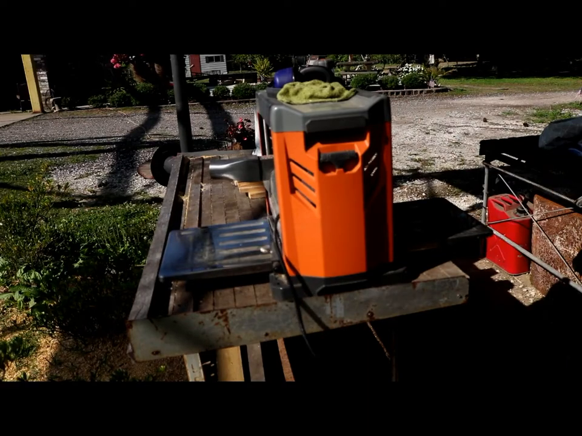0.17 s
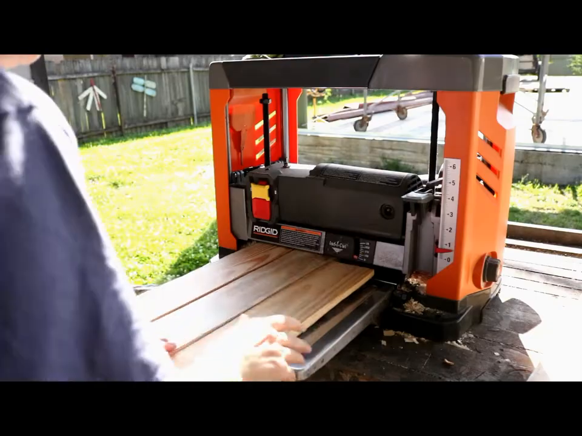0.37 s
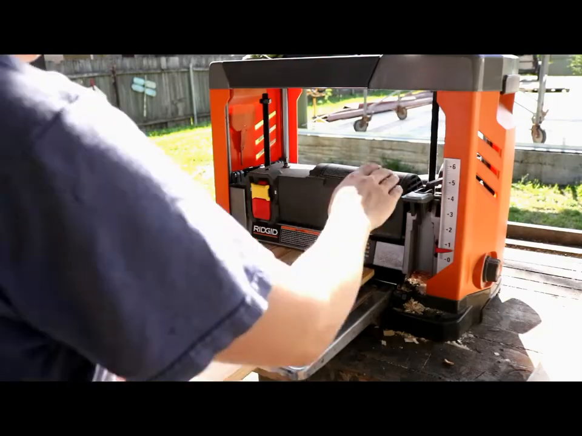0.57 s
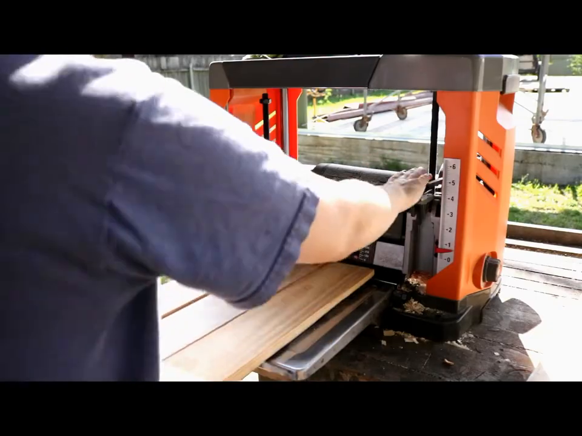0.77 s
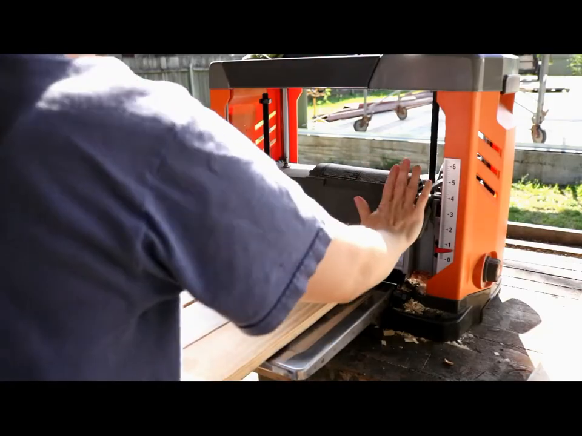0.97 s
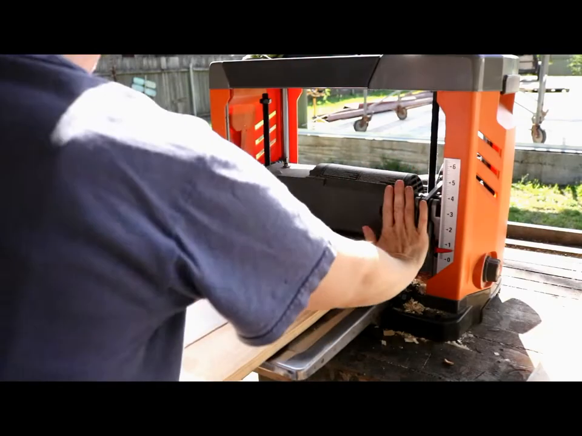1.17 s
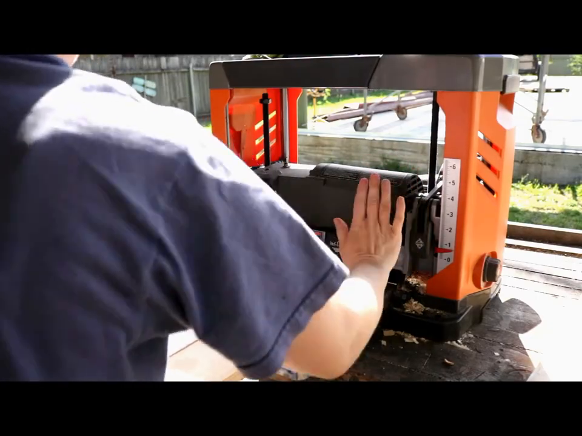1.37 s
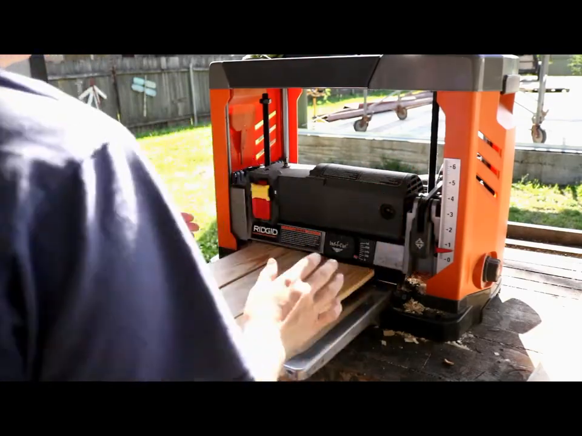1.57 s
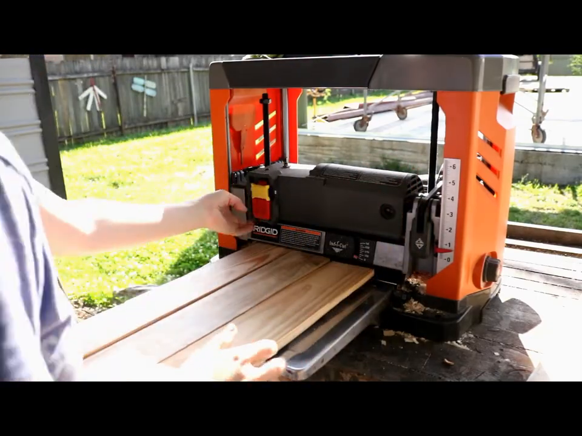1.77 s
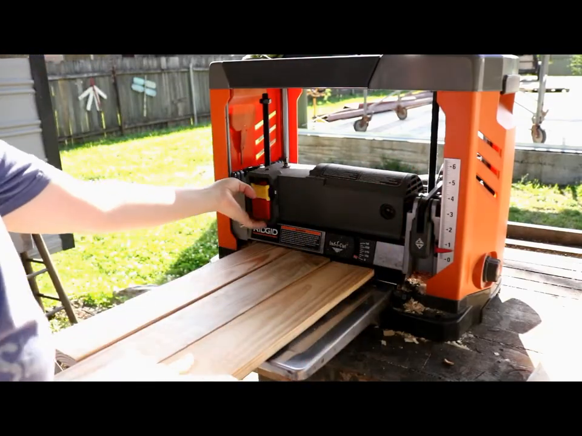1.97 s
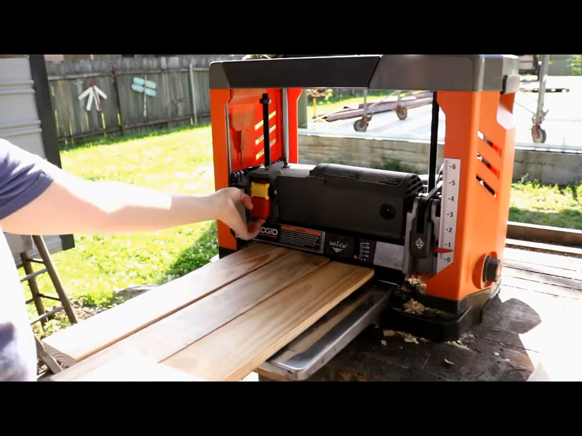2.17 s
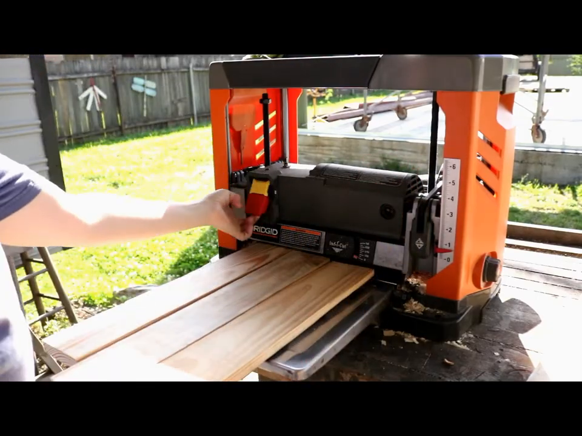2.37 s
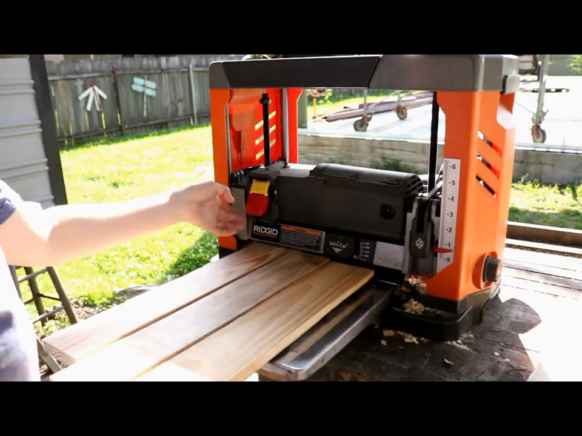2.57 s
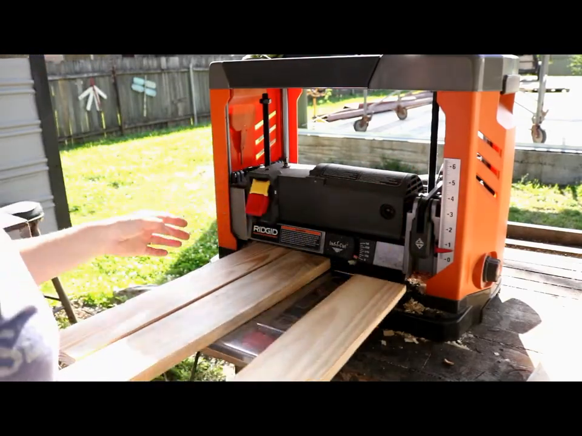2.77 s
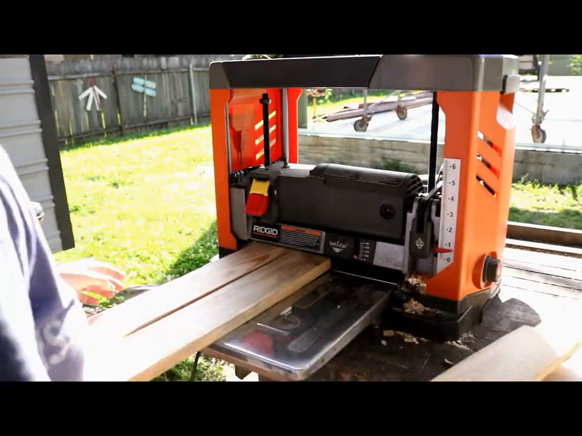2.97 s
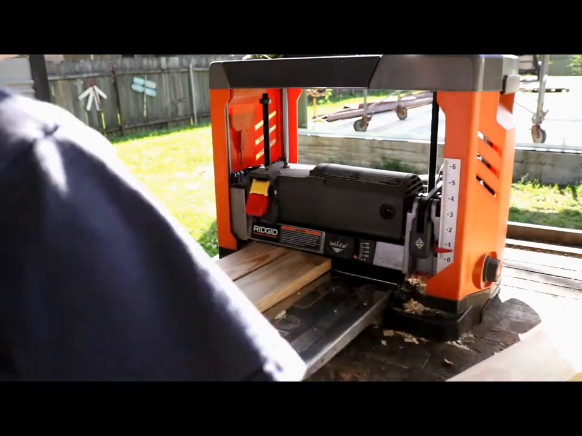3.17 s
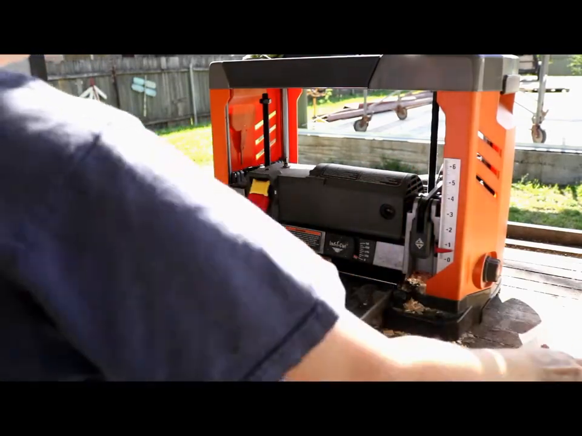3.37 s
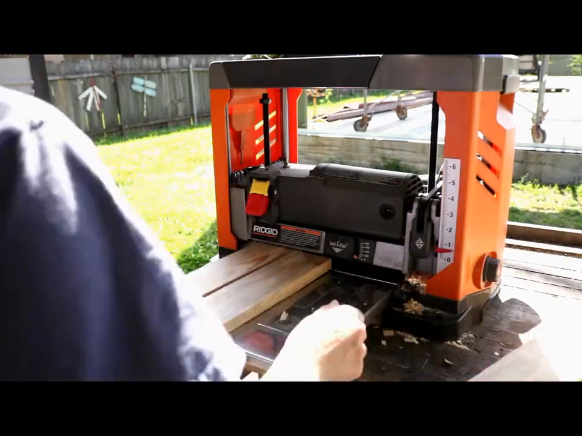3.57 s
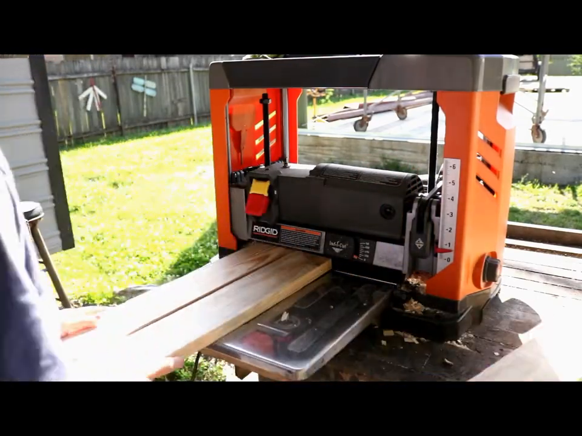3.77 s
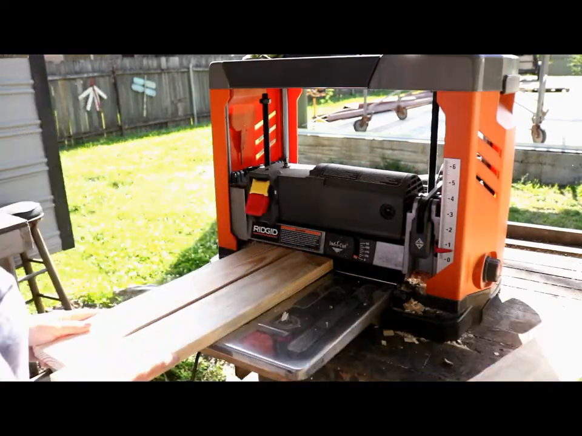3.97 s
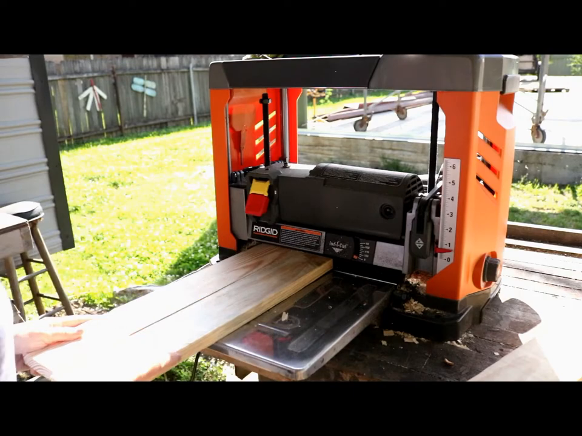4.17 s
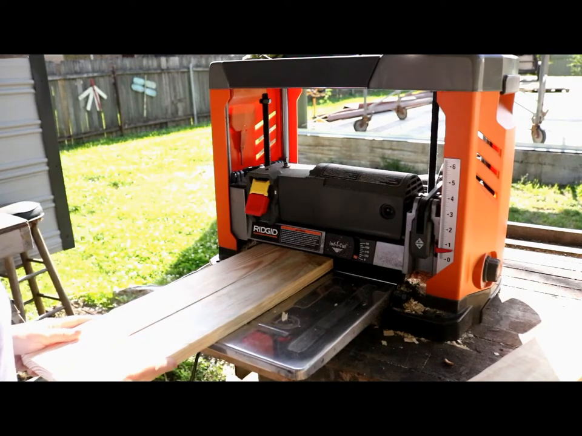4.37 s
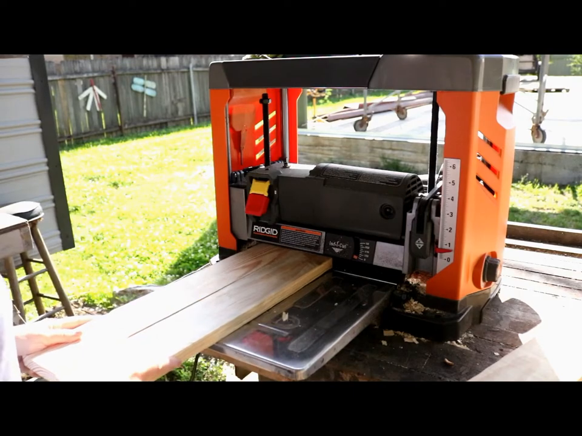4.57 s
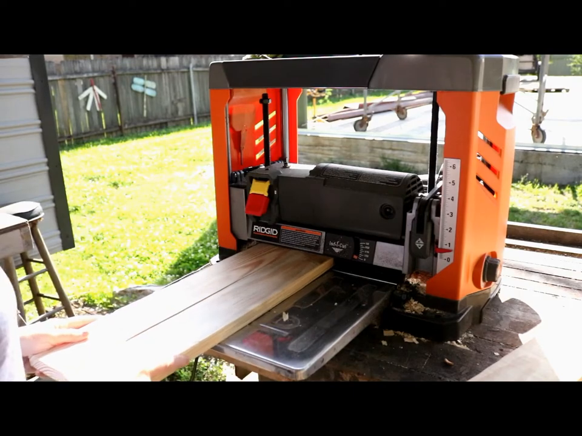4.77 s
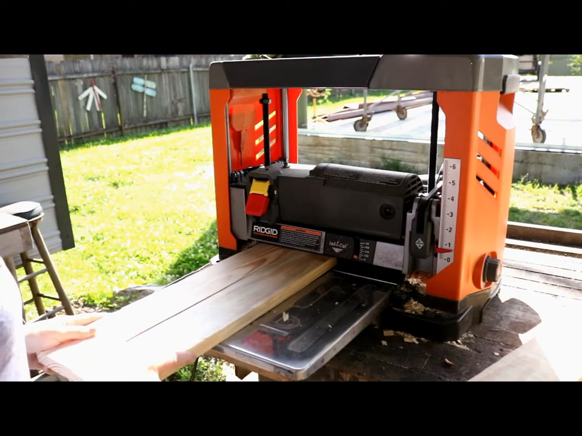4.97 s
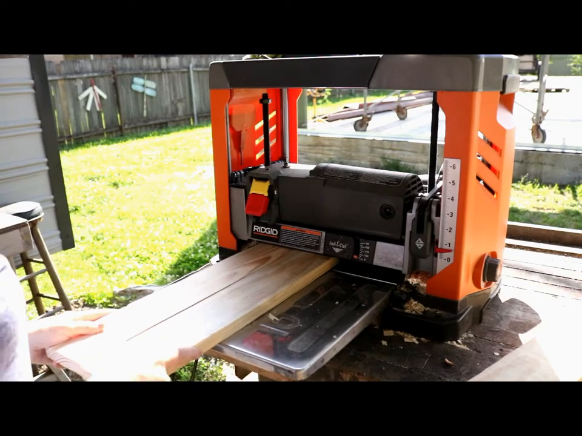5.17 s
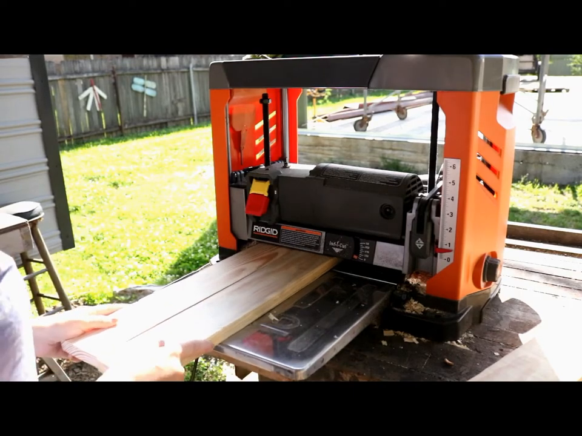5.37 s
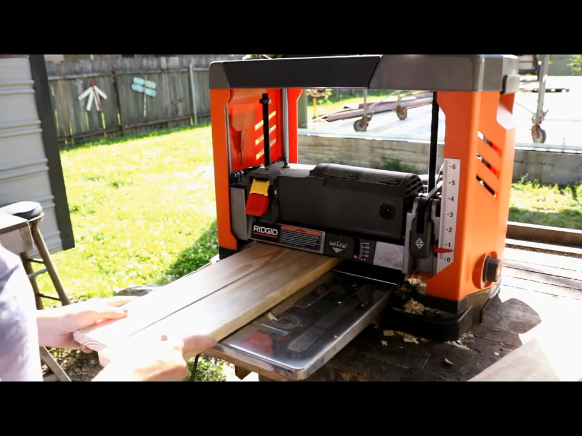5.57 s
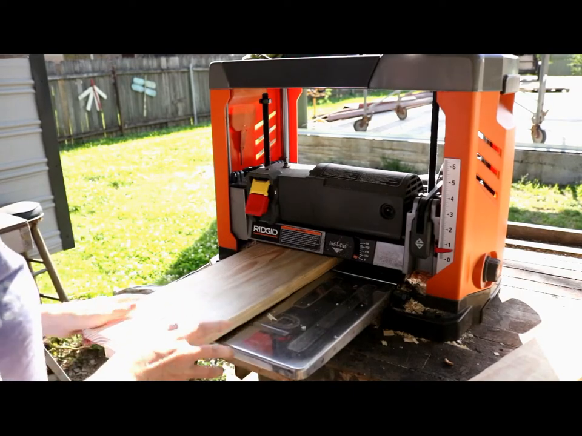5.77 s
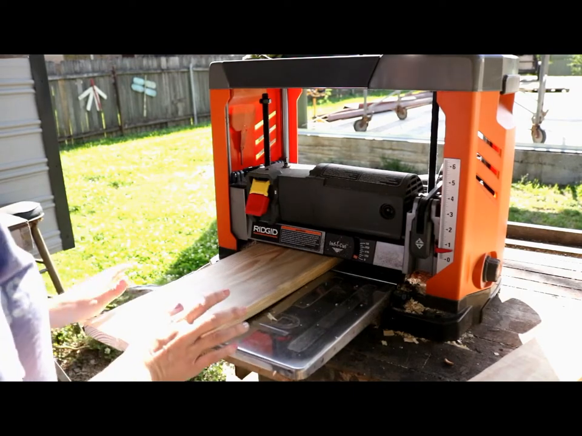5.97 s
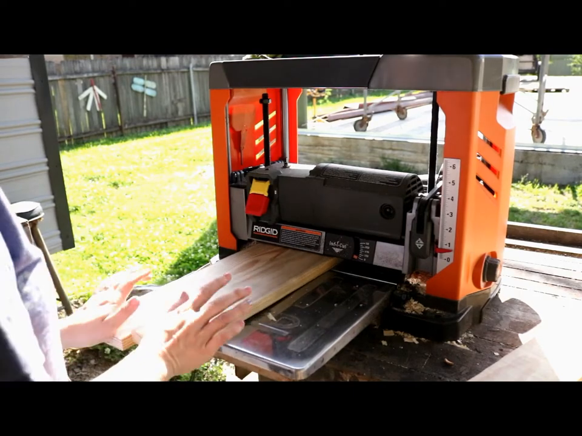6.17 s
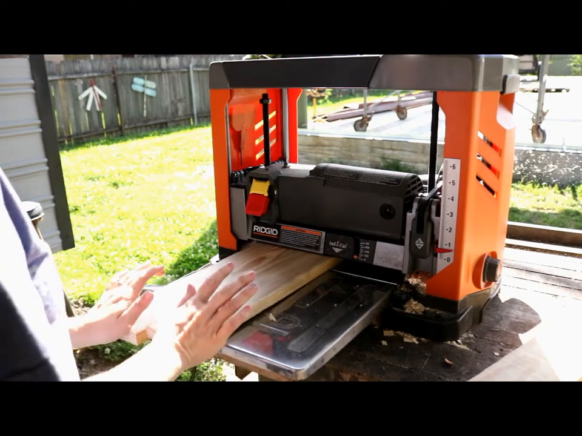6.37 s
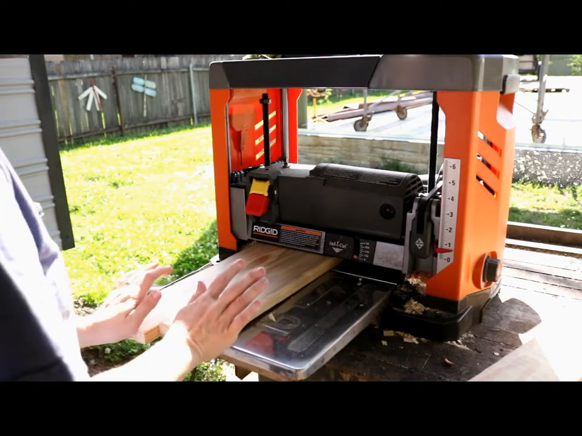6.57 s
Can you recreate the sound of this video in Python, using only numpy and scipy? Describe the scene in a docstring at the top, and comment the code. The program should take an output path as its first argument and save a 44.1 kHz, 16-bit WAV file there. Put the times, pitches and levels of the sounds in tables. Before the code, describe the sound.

A benchtop wood planer clicks on outdoors, winds up to a loud throbbing whine, then starts chopping into a board.

```python
"""First the hush of a yard: an engine hums far off, feet scuff and a bird whistles.
Close to the stereo microphone, the lever of a benchtop thickness planer snaps shut and its switch clicks.
The motor growls up to a siren whine that throbs against the cutterhead, over a rush of thrown air.
Near the end a board reaches the knives: they hammer chips off it and drag the motor down."""
import sys
import numpy as np
from scipy import signal
from scipy.fft import rfft, irfft, next_fast_len
from scipy.io import wavfile
from scipy.ndimage import map_coordinates

SR = 44100
rng = np.random.default_rng(int(sys.argv[2]) if len(sys.argv) > 2 else 0)


def materialize(psi):
    """Save the field psi as 16-bit PCM at rate SR to the path in sys.argv[1].

    A 1-D psi becomes a single channel; in a 2-D psi each row is a channel.
    """
    bounded = np.clip(np.atleast_2d(psi).T, -1, 1)
    quanta = np.round(bounded * 32767).astype(np.int16)
    wavfile.write(sys.argv[1], SR, quanta)


N = 291501
TIME = np.arange(N) / SR
ON_S, FEED_S, BITE_S = 2.32, 5.6, 6.224  # the motor starts, the rollers take the board, the knives bite
TONES_S, TONES_RISE_S = 2.374, 0.16  # the running tones fade in
FREE_HZ, BELT_RATIO = 438.1, .326875  # unloaded motor speed; cutterhead turns per motor turn


def motor_speed(surge_share=.4652, surge_s=.1579, creep_s=.5675, feed_drop_hz=2.2, sag_hz_per_s=100):
    """Turns per second: a quick surge and a slow creep toward free speed, then a sag under the cut."""
    t = np.maximum(TIME - ON_S, 0)
    shortfall = surge_share * np.exp(-t / surge_s) + (1 - surge_share) * np.exp(-t / creep_s)
    sag = sag_hz_per_s * np.cumsum(ramp(BITE_S, .07)) / SR
    return np.maximum(FREE_HZ * (1 - shortfall) - feed_drop_hz * ramp(FEED_S, .5) - sag, 0)


# The housing's response to the whine, its octave and further partials: (frequency [Hz], level [dB])
WHINE_RESPONSE = [(470, -60), (530, -30), (610, -20), (720, -20), (768, -16.5), (820, -15), (870, -16.7)]
OCTAVE_RESPONSE = [(500, -22), (900, -31), (1400, -37), (1650, -44.5), (1760, -34.5)]
PARTIAL_RESPONSE = [(1200, -46), (2050, -32.5), (2450, -39), (2620, -37.5), (3000, -49), (3500, -43.5),
                    (5500, -46), (7600, -52), (8500, -54.5), (9300, -59.5)]
# Resonances the octave sweeps through: (frequency [Hz], width [Hz], boost [dB])
OCTAVE_MODES = [(1107, 76, 12.5), (1424, 60, 7.5), (1566, 70, 13.5), (1716, 54.6, 11)]
# Further partials; the highest lies near twice the gears' whistle and lingers faintly: (order [cycles per motor
# turn])
PARTIAL_ORDERS = [6, 8, 21.2]
# The whine's place between the microphones: (frequency [Hz], left minus right [dB])
WHINE_BALANCE = [(530, -4), (700, -3.5), (795, 1), (830, -1), (872, -3)]
def motor_whine(speed, motor, lead_cycles=0.066, partial_lead_cycles=-0.089):
    """The motor's siren, close up: each tone swells and fades as it crosses the housing's response."""
    mics = np.array([[.5], [-.5]])  # a tone meets each microphone at its own level and phase
    motor = motor + 0.0055 * wobble(25)
    whine_db = along(WHINE_RESPONSE, 2 * speed) + 0.6 * wobble(30)
    whine_db = whine_db + mics * along(WHINE_BALANCE, 2 * speed)
    whine = amp(whine_db) * tone(2 * motor + mics * lead_cycles)
    octave_db = spectrum(OCTAVE_RESPONSE, OCTAVE_MODES)(4 * speed) + 1.2 * wobble(25)
    partials = amp(octave_db) * tone(4 * motor + mics * partial_lead_cycles)
    for order in PARTIAL_ORDERS:
        partial_db = along(PARTIAL_RESPONSE, order * speed) + 2.36 * wobble(20)
        partials += amp(partial_db) * tone(order * motor + mics * partial_lead_cycles)
    return ramp(TONES_S, TONES_RISE_S) * board_muffle() * (whine + partials * amp(mics * 0.79))


# The housing's response to the passing knives: (frequency [Hz], level [dB])
KNIFE_RESPONSE = [(160, -36), (255, -34), (310, -29.5), (364, -22), (400, -30.5), (419, -38), (428, -27.5)]
# Shaking, with half orders from the belt: (order [cycles per cutterhead turn], level before strain [dB])
SHAKE_ORDERS = [(2, -50), (2.5, -53.5), (3.5, -62), (4, -42.5), (4.5, -50), (9, -44)]
def cutterhead(speed, cutter):
    """Three spinning knives hum; their second harmonic lies just below the whine and beats with it."""
    cutter = cutter + 0.0029 * wobble(20)
    knives = amp(along(KNIFE_RESPONSE, 3 * BELT_RATIO * speed)) * tone(3 * cutter)
    throb = amp(-31 + wobble(6)) * tone(6 * cutter)
    shaking = sum(amp(db + 2.5 * wobble(8)) * tone(order * cutter) for order, db in SHAKE_ORDERS)
    strain = amp(np.interp(speed, [205, 365, 418], [-3, 7.5, 0]))  # the belt pulls hardest in the run-up
    unbalance = amp(-51) * (speed / FREE_HZ) ** 25 * tone(cutter)
    muffle = board_muffle()
    hum = muffle * strain * (throb + shaking) + np.sqrt(muffle) * knives + unbalance
    return ramp(TONES_S, TONES_RISE_S) * hum


def board_muffle(depth_db=-8.5, close_s=0.17):
    """Gain on the running tones: the board blocks the opening and damps them."""
    return amp(depth_db * ramp(BITE_S, close_s))


# Level of the hiss as heard, ducking while the whistle and whine are loudest: (time [s], level [dB])
HEARD_HISS_LEVELS = [(2.45, -33), (2.6, -40), (2.63, -32), (2.64, -29.5), (2.71, -32), (3.1, -33.5),
                     (3.15, -37), (4.09, -32.5), (4.22, -35), (5.43, -35), (5.49, -36), (6.2, -36.5)]
# Colour of the rush: (frequency [Hz], relative level [dB])
RUSH_SPECTRUM = [(20, -17.5), (60, -23.5), (150, -9.5), (300, -6), (600, 0.5), (1000, 1.5), (1900, 1),
                 (2700, -0.5), (3600, -5.5), (6200, -10), (9000, -16.5), (11000, -25.5), (15500, -38.5)]
# Resonances of the housing: (frequency [Hz], width [Hz], boost [dB])
HOUSING_MODES = [(384, 74, 8), (826, 276, 7), (2250, 340, 3), (3033, 340, 9), (4223, 320, 8.5)]
# The rush's place between the microphones: (frequency [Hz], left minus right [dB])
RUSH_BALANCE = [(60, 7.5), (110, 0.5), (200, 4), (380, 0.0), (700, -3), (1290, -1.5), (2380, 4), (4400, 0),
                (8120, -1), (15000, 0.5)]
def air_rush(cutter, pulse_depth=0.097, body_over_hiss_db=9.5):
    """Fan and cutterhead throw air through the housing, pulsing with each turn of the cutterhead."""
    flow = noise(side_db=0) * (1 + pulse_depth * np.sin(2 * np.pi * cutter))
    left, right = shaped(flow, RUSH_SPECTRUM, HOUSING_MODES)
    left = coloured(left, lambda hz: along(RUSH_BALANCE, hz) / 2)
    right = coloured(right, lambda hz: -along(RUSH_BALANCE, hz) / 2)
    level_db = np.interp(TIME, *np.transpose(HEARD_HISS_LEVELS)) + body_over_hiss_db + .5 * wobble(12)
    return np.array([left, right]) * amp(level_db) * ramp(ON_S, 0.011)


# Colours of the dull blows and the bright snap: (frequency [Hz], relative level [dB])
BLOW_SPECTRUM = [(60, -32), (300, -28), (600, -12), (850, 4.5), (1250, 8.5), (1700, 6.5), (2200, 1),
                 (3600, 1), (6000, -32), (15500, -44)]
SNAP_SPECTRUM = [(100, -52), (1000, -13), (1800, -4), (2900, 0.5), (3600, 1), (4400, -4.5), (5500, -7.5),
                 (9000, -14.5), (12000, -23.5), (15500, -31)]
# Resonances of board and bed: (frequency [Hz], width [Hz], boost [dB])
BOARD_MODES = [(550, 110, 7), (1240, 200, 4.5), (1597, 250, 8.5), (1920, 330, 8), (2900, 580, 3.5),
               (4240, 310, 8.5)]
# Harder grain tears brightly: (time [s], level [dB], half length [s])
GRAIN_TEARS = [(6.245, -22.5, 0.026), (6.33, -33.5, 0.028), (6.405, -25.5, 0.031), (6.54, -33, 0.011)]
def cutting(cutter, knives=3, low_knife_gain=.2, scatter_db=1.2, tear_s=0.004, hood_t60=0.018):
    """Each knife strikes the board and tears off a chip; one stands proud and hits hardest."""
    passes = np.floor(cutter * knives).astype(int)
    hits = np.flatnonzero(np.diff(passes)) + 1
    scatter = amp(scatter_db * rng.standard_normal(N)[passes[hits]])
    blows = np.zeros(N)
    blows[hits] = np.where(passes[hits] % knives, low_knife_gain, 1) * scatter
    tear_envelope = signal.lfilter([1], [1, -np.exp(-1 / (tear_s * SR))], blows)
    fibres = amp(-9) * unit(tear_envelope * noise(side_db=-1))
    t = np.arange(SR // 40) / SR
    hood = rng.standard_normal((2, len(t))) * amp(-60 * t / hood_t60)  # dense reflections under the hood
    smeared = unit(signal.fftconvolve(blows[None], hood, axes=1)[:, :N])
    dull = shaped(amp(-4) * unit(blows) + smeared + fibres, BLOW_SPECTRUM, BOARD_MODES)
    snap = shaped(smeared + 2 * fibres, SNAP_SPECTRUM, BOARD_MODES)
    snap_gain = (amp(-28.5) + swells(GRAIN_TEARS)) * ramp(BITE_S, .012)
    return amp(-23) * ramp(BITE_S, 0.043) * dull + snap_gain * snap


def inrush(speed, motor, pull_hz=120, chop_depth=0.45):
    """Starting current pulls on the motor twice per mains cycle and falls as the speed rises."""
    current = (1 - speed / FREE_HZ) * ramp(ON_S, 0.084)
    pulls = pull_hz * TIME
    chop = unit(1 + chop_depth * np.sin(2 * np.pi * pulls))
    whistle = current * chop * gear_whistle(speed, motor)
    return (TIME > ON_S) * (pan(whistle, 1.5) + frame_growl(current, pulls, chop))


# The gears' whistle across its sweep: (frequency [Hz], level at full current [dB])
GEAR_RESPONSE = [(700, -38), (1400, -23), (1720, -13), (2100, -19), (2900, -23), (3350, -20.5), (3600, -33),
                 (5200, -32.5), (8000, -40), (13000, -58)]
# Resonances it sweeps through: (frequency [Hz], width [Hz], boost [dB])
GEAR_MODES = [(2110, 360, 4.1), (2630, 300, 11.8), (3120, 190, 9.6)]
# Its harmonics: (order [cycles per tooth], gain [dB])
GEAR_HARMONICS = [(1, 1.5), (2, -8), (3, -8.5)]
def gear_whistle(speed, motor, teeth_per_turn=10.72):
    """Meshing teeth whistle, rough and rising with the motor's speed."""
    teeth = teeth_per_turn * motor + 0.11 * wobble(300)
    response = spectrum(GEAR_RESPONSE, GEAR_MODES)
    return sum(amp(db + response(order * teeth_per_turn * speed) + 3.7 * wobble(60)) * tone(order * teeth)
               for order, db in GEAR_HARMONICS)


# The frame shakes at the mains hum: (time [s], level [dB], half length [s])
FRAME_SHUDDER = [(2.415, -27.5, .045)]
# Colour of the rattle: (frequency [Hz], relative level [dB])
RATTLE_SPECTRUM = [(30, -27), (150, 8), (280, 2), (700, 6), (1300, 3), (2300, 2.5), (3600, -12),
                   (8000, -22.5), (15500, -38)]
def frame_growl(current, pulls, chop):
    """The frame groans as the rotor starts, then growls and rattles under the current's pull."""
    shudder = swells(FRAME_SHUDDER)
    growl = (amp(-33) * current + shudder) * (tone(2 * pulls) + amp(-3.5) * tone(3 * pulls))
    rattle = shaped(chop * noise(side_db=3), RATTLE_SPECTRUM, HOUSING_MODES)
    groan_hz = np.interp(TIME, [2.33, 2.342], [900, 620])
    groan = swells([(2.336, -10.5, 0.0056)]) * tone(np.cumsum(groan_hz) / SR)
    return growl + (amp(-19) * current + amp(-3) * shudder) * rattle + groan


# The lever and its rebound, a tick, the switch and its bounce:
# (time [s], crack level [dB], edge level [dB], ring level [dB], crack and edge t60 [s])
CONTACTS = [(1.1925, 3, -20, -11.5, 0.02), (1.199, -17, -35, -14.5, 0.018), (1.868, -35, -47, -60, 0.019),
            (2.3204, 1.5, -6, -17.5, 0.015), (2.3267, -6.5, -15, -16, 0.02)]
# Colours of crack, bright edge and ring: (frequency [Hz], relative level [dB])
CRACK_SPECTRUM = [(100, -30), (700, -7), (1600, -5), (2650, 7), (3300, -0.5), (4300, -4), (5800, -20.5),
                  (8000, -19), (11000, -36), (16000, -49)]
EDGE_SPECTRUM = [(1000, -32), (4500, -7), (7500, 0), (11000, -13.5), (16000, -28)]
RING_SPECTRUM = [(100, -36), (400, -9), (1000, -0.5), (2500, -3.5), (5000, -10.5), (15000, -33)]
# Resonances of the frame: (frequency [Hz], width [Hz], boost [dB])
FRAME_MODES = [(457, 99, 5), (890, 160, 10), (1360, 240, 8), (1710, 200, 0), (2160, 220, 1),
               (3000, 240, 9.5)]
def lever_and_switch(ring_t60=0.084):
    """Hard contacts near the microphone: a short crack with a bright edge, then the frame's dense ring."""
    cracks, edges, rings = np.zeros((3, N + SR))
    t = np.arange(SR // 2) / SR
    for s, crack_db, edge_db, ring_db, crack_t60 in CONTACTS:
        span = slice(round(s * SR), round(s * SR) + len(t))
        cracks[span] += amp(crack_db - 60 * t / crack_t60)
        edges[span] += amp(edge_db - 60 * t / crack_t60)
        rings[span] += amp(ring_db - 60 * t / ring_t60)
    crack = shaped(noise(side_db=-3), CRACK_SPECTRUM)
    edge = shaped(noise(side_db=0), EDGE_SPECTRUM)
    ring = shaped(noise(side_db=2.5), RING_SPECTRUM, FRAME_MODES)
    return cracks[:N] * crack + edges[:N] * edge + rings[:N] * ring


# The board meets the bed: (time [s], level [dB], t60 [s])
BED_KNOCKS = [(3.416, -17, 0.091), (6.464, -14, 0.044), (6.576, -12, 0.063)]
# Colour of the wood: (frequency [Hz], relative level [dB])
WOOD_SPECTRUM = [(100, -32), (700, -11), (1400, -3), (2200, -6), (4000, -14), (8000, -32), (15000, -58)]
def board_knocks(rise_s=0.0025):
    """Dull wooden knocks at the planer ring board and bed."""
    dying = sum(ramp(s, rise_s) * amp(db - 60 * np.abs(TIME - s) / t60) for s, db, t60 in BED_KNOCKS)
    return dying * shaped(noise(side_db=-2.5), WOOD_SPECTRUM, BOARD_MODES)


# Gritty scuffs and soft bumps: (time [s], level [dB], half length [s])
WORKER_SCUFFS = [(.435, -36.5, 0.03), (.485, -36, 0.021), (.53, -45, 0.017), (1.32, -43, 0.048),
                 (1.39, -42.5, 0.051)]
HANDLING_BUMPS = [(.49, -44, .025), (1.32, -44, .04), (3.24, -49, .1), (5.67, -46, .025)]
def worker():
    """Beside the planer, the worker steps up, lets go of the lever and handles the boards."""
    grit = shaped(noise(side_db=-2) * amp(1.5 * wobble(400)), RATTLE_SPECTRUM)
    thud = shaped(noise(side_db=-6), [(20, -10), (90, 8), (200, -12), (600, -48)])
    return swells(WORKER_SCUFFS) * grit + swells(HANDLING_BUMPS) * thud


# Notes: (time [s], length [s], first pitch [Hz], middle pitch [Hz], last pitch [Hz], level [dB])
BIRD_NOTES = [(.64, 0.11, 2520, 2700, 2720, -52), (1.003, .19, 2520, 2880, 2980, -54),
              (1.113, 0.1, 4600, 3600, 3350, -47), (1.444, .22, 2220, 2880, 3040, -49.5),
              (1.67, 0.065, 3600, 4250, 4350, -58)]
def bird(quaver_depth=0.027, quaver_hz=19):
    """A bird, faint and centred, slurs thin whistles with a quaver."""
    song = np.zeros(N)
    for s, length, first, middle, last, db in BIRD_NOTES:
        progress = np.clip((TIME - s) / length, 0, 1)
        slur_hz = np.polyval(np.polyfit([0, .5, 1], [first, middle, last], 2), progress)
        quaver = quaver_depth * np.sin(2 * np.pi * quaver_hz * (TIME - s))
        pitch_hz = slur_hz * (1 + quaver + 0.017 * wobble(400))
        song += amp(db) * np.sin(np.pi * progress) * tone(np.cumsum(pitch_hz) / SR)
    return song * amp(3 * wobble(90))


# Decay of the yard's reflections: (frequency [Hz], t60 [s])
WALL_DECAY = [(200, 0.7), (1000, 0.21), (3000, 0.28), (10000, 0.1)]
def walls(x):
    """The house wall and fence answer with a short tail, 5 ms behind the direct sound."""
    hz, t, bins = signal.stft(rng.standard_normal((2, SR // 2)), SR, nperseg=256)
    decay_db = -60 * t / along(WALL_DECAY, hz)[:, None]
    colour_db = along([(900, 0.5), (3000, -14.0), (10000, -2.5)], hz)[:, None]
    tail = signal.istft(bins * amp(decay_db + colour_db), SR, nperseg=256)[1]
    delayed = np.pad(x, ((0, 0), (SR // 200, 0)))
    return signal.fftconvolve(delayed, tail / np.linalg.norm(tail[0]), axes=1)[:, :N]


# Colour of the open air: (frequency [Hz], relative level [dB])
HUSH_SPECTRUM = [(20, -27), (45, -13), (65, -6.5), (130, -4), (260, -11.5), (550, -14.5), (1100, -15.5),
                 (2700, -23), (5000, -27.5), (9000, -36), (11500, -45), (16000, -57)]
# Hum of the far engine: (frequency [Hz], level [dB])
ENGINE_TONES = [(69, -44.5), (114, -53.5), (237, -55.5), (287, -56.5)]
def yard(start_s=0.2437, recede_db=-22):
    """A wide outdoor hush and an engine far off; both recede once the motor runs."""
    hush = amp(-40.5) * shaped(noise(side_db=5), HUSH_SPECTRUM)
    engine = sum(amp(db + 1.9 * wobble(7.7)) * tone(hz * TIME + 0.095 * wobble(9))
                 for hz, db in ENGINE_TONES)
    return ramp(start_s, 0.0037) * amp(recede_db * ramp(ON_S, 0.37)) * (hush + engine)


# Stereo width at the microphones: (frequency [Hz], side minus mid [dB])
STEREO_WIDTH = [(60, -12), (110, -16.5), (200, -22), (380, -12.5), (700, -13.5), (1290, -9.5), (2380, -4.5),
                (4400, -6), (8120, -2), (15000, 5)]
def noise(side_db):
    """Stereo noise, alike in the bass and wide in the treble; side_db widens it further."""
    size = next_fast_len(N)
    mid, side = rng.standard_normal((2, N))
    side_gain = amp(along(STEREO_WIDTH, np.fft.rfftfreq(size, 1 / SR)) + side_db)
    side = irfft(rfft(side, size) * side_gain, size)[:N]
    return np.array([mid + side, mid - side])


def amp(db):
    """Decibels to gain."""
    return 10 ** (np.asarray(db) / 20)


def unit(x):
    """x at rms 1."""
    return x / np.sqrt(np.mean(x ** 2) + 1e-20)


def tone(cycles):
    """A sine of rms 1 that follows a count of cycles."""
    return np.sqrt(2) * np.sin(2 * np.pi * cycles)


def pan(x, db):
    """Place a sound, left louder by db."""
    return np.array([x * amp(db / 2), x * amp(-db / 2)])


def ramp(start_s, length_s):
    """A straight rise from 0 to 1."""
    return np.clip((TIME - start_s) / length_s, 0, 1)


def swells(rows):
    """Soft-edged bursts from (time [s], level [dB], half length [s]) rows."""
    return sum(amp(db) * np.exp(-((TIME - s) / half) ** 2) for s, db, half in rows)


def wobble(rate):
    """A smooth random curve, rate knots a second."""
    knots = rng.standard_normal(int(N * rate / SR) + 4)
    coarse_s = np.linspace(0, N / SR, int(8 * rate * N / SR))
    return np.interp(TIME, coarse_s, map_coordinates(knots, [coarse_s * rate]))


def along(points, hz):
    """Read (frequency [Hz], value) points at hz, on a log axis."""
    point_hz, values = np.transpose(points)
    return np.interp(np.log(hz + 1), np.log(point_hz + 1), values)


def spectrum(points, modes):
    """Level in dB as a function of Hz: a curve lifted by resonances."""
    return lambda hz: along(points, hz) + sum(db / (1 + (2 * (hz - centre) / width) ** 2)
                                              for centre, width, db in modes)


def coloured(x, gain_db, size=16384):
    """x through the causal filter whose level is gain_db(Hz)."""
    cepstrum = irfft(np.log(amp(gain_db(np.fft.rfftfreq(size, 1 / SR)))), size)
    cepstrum[1:size // 2] *= 2  # fold to minimum phase
    cepstrum[size // 2 + 1:] = 0
    impulse = irfft(np.exp(rfft(cepstrum)))[:size // 2]
    padded = next_fast_len(N + size)
    return irfft(rfft(x, padded) * rfft(impulse, padded), padded)[..., :N]


def shaped(x, points, modes=()):
    """x coloured by a curve and its resonances, at rms 1."""
    return unit(coloured(x, spectrum(points, modes)))


def scene(throb_offset_turns=.283):
    """The planer close to the microphone, the yard behind it."""
    speed = motor_speed()
    motor = np.cumsum(speed) / SR  # turns made
    # the offset sets when the throbs between whine and cutterhead fall
    cutter = BELT_RATIO * np.maximum(motor - throb_offset_turns, 0)
    brief_sounds = lever_and_switch() + bird()
    machine = motor_whine(speed, motor) + cutterhead(speed, cutter) + inrush(speed, motor)
    planer = machine + air_rush(cutter) + cutting(cutter) + board_knocks()
    return planer + brief_sounds + amp(-12.5) * walls(brief_sounds) + yard() + worker()


def record(dry, release_db_per_s=90, attack_s=0.0029, top_hz=15800):
    """Behind the microphone a limiter ducks after peaks; what slips through clips, then the top is cut."""
    over_db = np.maximum(20 * np.log10(np.abs(dry).max(0) + 1e-9), 0)
    release_db = release_db_per_s * TIME
    held_db = np.maximum.accumulate(over_db + release_db) - release_db
    lag = np.exp(-1 / (attack_s * SR))
    duck_db = signal.lfilter([1 - lag], [1, -lag], held_db)
    limited = np.clip(dry * amp(-duck_db), -1, 1)
    size = next_fast_len(N + SR // 2)
    band = np.clip(.5 + (top_hz - np.fft.rfftfreq(size, 1 / SR)) / 800, 0, 1)
    return irfft(rfft(limited, size) * band, size)[:, :N]


dry = scene()
out = record(dry)
materialize(out)
```